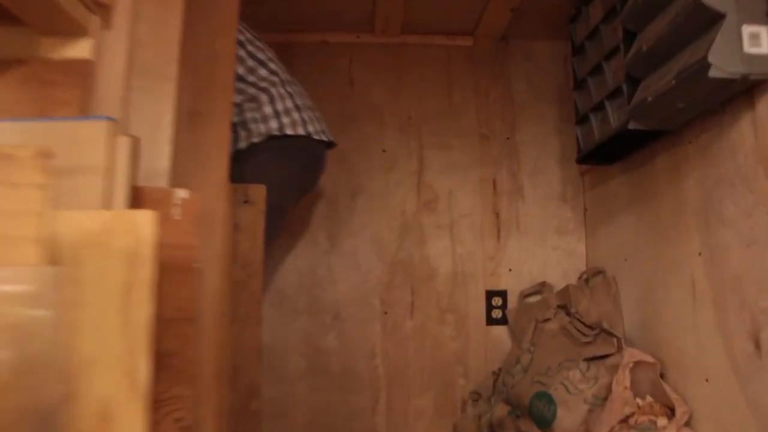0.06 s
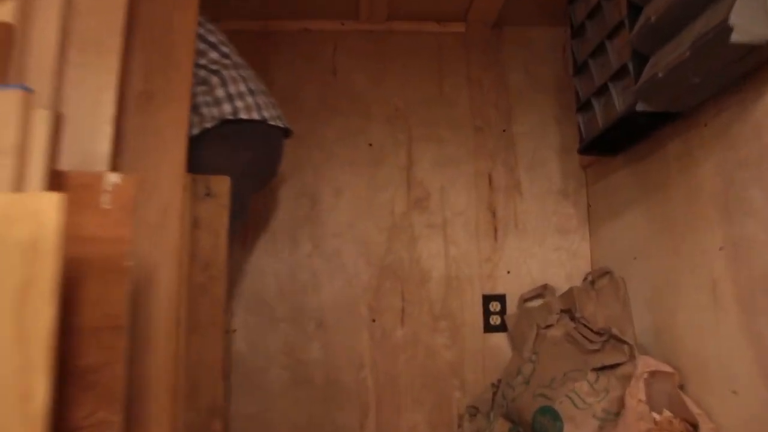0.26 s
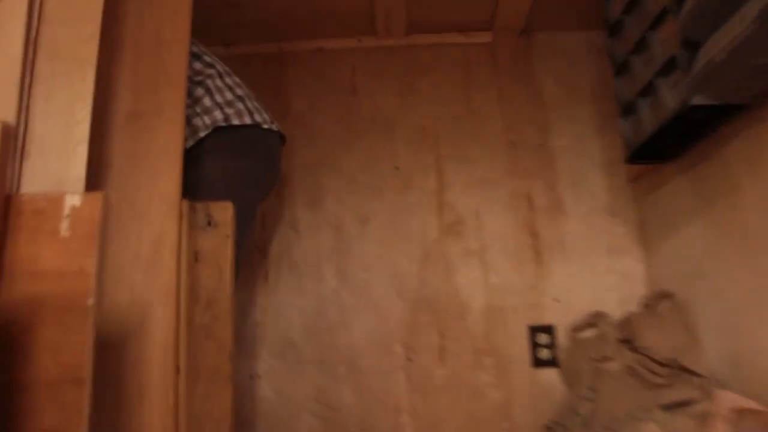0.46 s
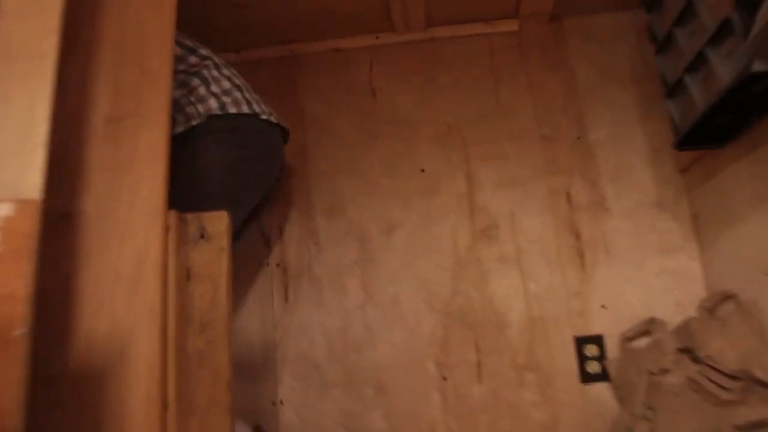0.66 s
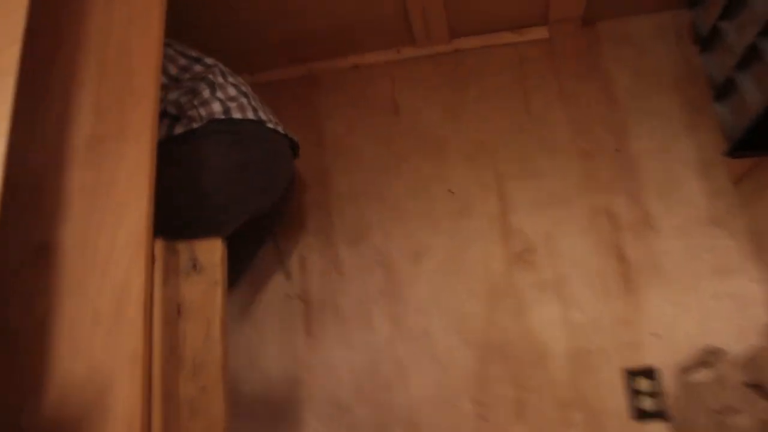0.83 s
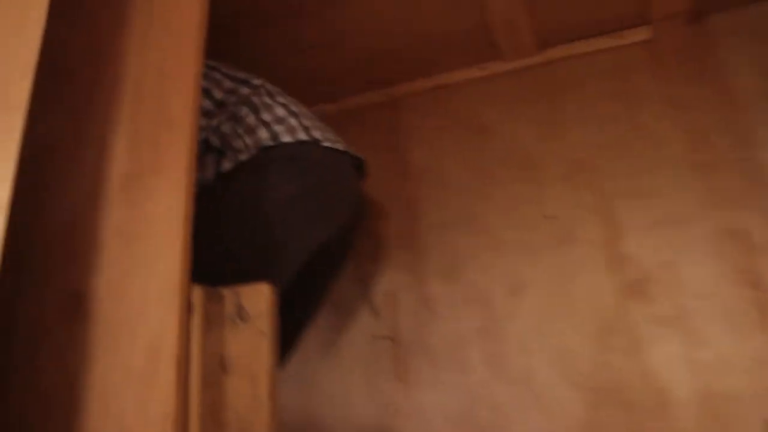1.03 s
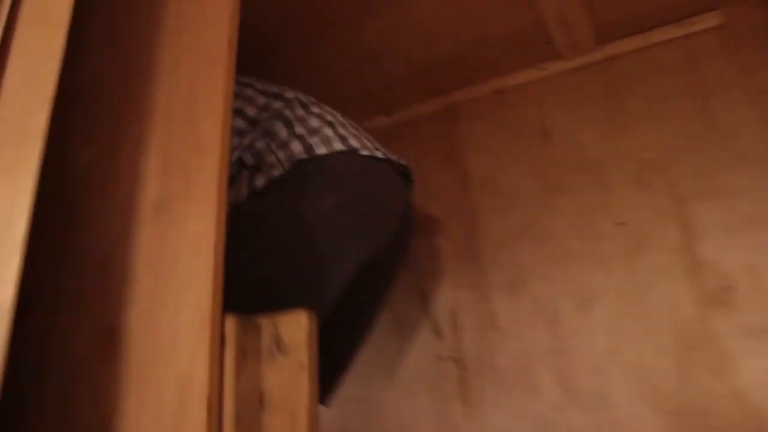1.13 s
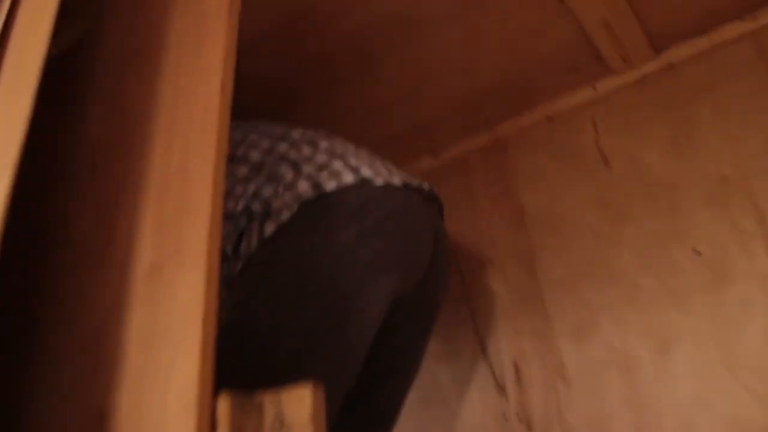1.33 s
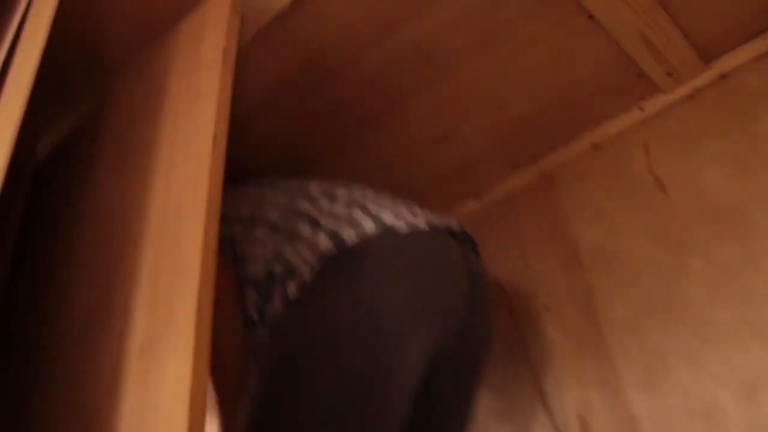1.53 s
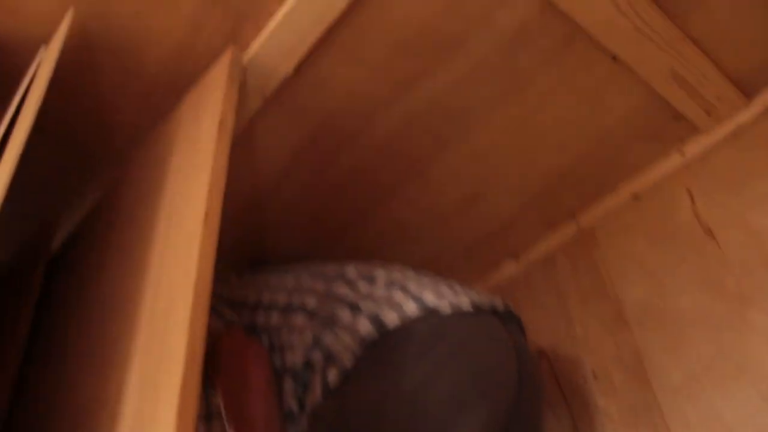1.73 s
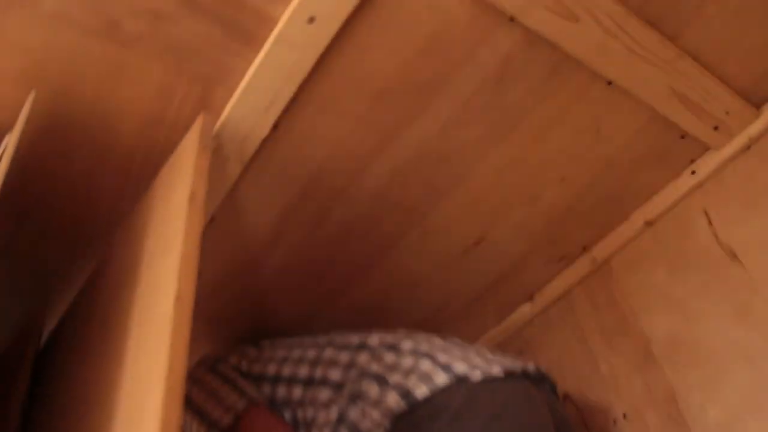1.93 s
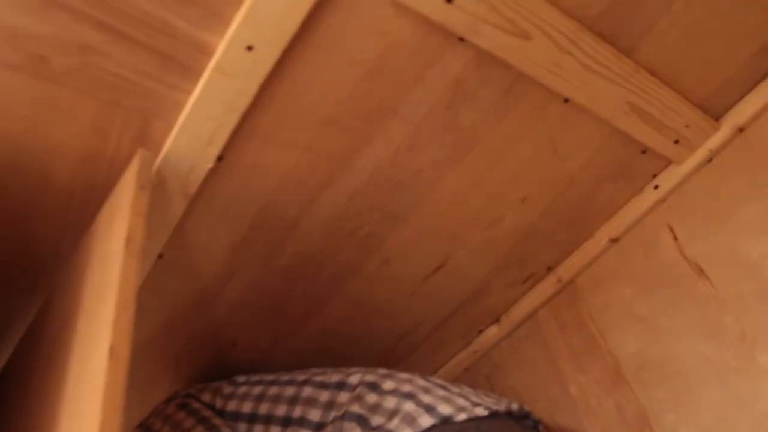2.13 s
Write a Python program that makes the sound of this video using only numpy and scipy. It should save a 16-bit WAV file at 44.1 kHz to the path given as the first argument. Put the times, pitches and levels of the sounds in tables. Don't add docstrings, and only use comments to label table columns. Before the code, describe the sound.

Footsteps climb steep wooden stairs in a small plywood room: two hard, hollow knocks with deep boom, then a soft padded step with scuffing, over steady low motor hum, picked up close in mono.

```python
import sys
import numpy as np
from scipy import signal
from scipy.io import wavfile

SR = 44100
rng = np.random.default_rng(int(sys.argv[2]) if len(sys.argv) > 2 else 0)


def how_loud(loudness_db):
    steps = np.asarray(loudness_db, float) / 20
    return 10 ** steps


def pcm_store(signal):
    levels = np.round(np.clip(np.atleast_2d(signal), -1, 1) * 32767)
    wavfile.write(sys.argv[1], SR, levels.astype(np.int16).T)


N = 97020

# multiple of shaft rate, level/dB rms, waver/dB, phase/turns
HUM_LINES = [(1, -37.5, 1.17, 0.06), (2, -41.5, 1.83, 0.6), (3, -57.5, 1.3, 0.39), (4, -59, 2, 0.73),
             (15, -69, 2.8, 0.33)]
SHAFT_HZ = 58.9
FAN_HZ, FAN_DB = 92.6, -45
# f/Hz, width/Hz, level/dB rms
CASING_MODES = [(281, 39, -62), (538.6, 24, -64), (623, 22, -66), (1163, 8.3, -73), (1570, 20, -82.5),
                (2433, 8, -73.5)]
# f/Hz, level/dB per Hz
AIR_SPECTRUM = [(12, -5), (30, -2.5), (75, -9), (145, -14), (280, -18), (400, -27.5), (958, -33.5),
                (2400, -38)]
AIR_DB, AIR_TOP_HZ, AIR_TOP_DB = -43.5, 15700, -81

# t/s, level/dB
RUSTLE_LEVEL = [(0, -61.5), (.05, -67.5), (.2, -69.5), (.36, -63.5), (.5, -67.5), (.66, -65), (.72, -62.5),
                (.88, -63.5), (.93, -67.5), (1.02, -68.5), (1.2, -66.5), (1.27, -70), (1.5, -68),
                (1.62, -69), (1.7, -67.5), (1.78, -72.5), (2.17, -69), (2.2, -73)]
# f/Hz, level/dB per Hz
CLOTH_SPECTRUM = [(1500, -18), (2500, -0.5), (4000, 3), (6000, -0.5), (9000, -1.5), (12000, -1.5),
                  (16500, -10.5)]

# t/s, peak level/dB, f/Hz, t60/s
GRIT_TICKS = [
    (0.152, -41.5, 2980, 0.013),
    (.4095, -58, 5500, 0.0057),
    (0.4097, -47, 6060, 0.0071),
]

# t/s, peak level/dB, sway level/dB, boom level/dB
HARD_STEPS = [
    (.217, -6, -22, -16),
    (1.033, -9, -17.5, -19.5),
]
# f/Hz, level/dB, t60/s
FIRST_TREAD_MODES = [(152, -4, 0.13), (234, 2, 0.04), (408, 4, 0.072), (467, 2.5, 0.062), (610, -5, 0.11),
                     (773, -11, 0.055), (866, -8.5, 0.1), (1017, -5.5, 0.055), (1185, 0.5, 0.034),
                     (1648, 0.5, 0.025), (2020, -20, 0.082), (2320, -14, 0.08), (2490, -22, .06),
                     (3080, -6, 0.017)]
# f/Hz, level/dB, t60/s
SECOND_TREAD_MODES = [(195, 2.5, 0.08), (309, 1.5, 0.052), (407, -2, 0.04), (660, -18, 0.09),
                      (742, -6, 0.062), (980, -10.5, 0.064), (1186, -10.5, 0.053), (1340, -6, 0.046),
                      (1470, -14.5, 0.024), (1714, -6, 0.04), (2027, -17.5, 0.095), (2468, -7.5, 0.038),
                      (2743, -10, 0.039), (3380, -16.5, 0.037)]
# f/Hz, level/dB per Hz
FIRST_KNOCK_SPECTRUM = [(59, -29), (100, 3), (262, -9.5), (434, -2.5), (748, -13), (1960, -20), (4350, -32),
                        (15000, -94)]
# f/Hz, level/dB per Hz
SECOND_KNOCK_SPECTRUM = [(59, -27), (100, -3.5), (375, -19.5), (646, -12), (1090, -33), (1210, -24),
                         (2580, -29.5), (15000, -108)]
# f/Hz, t60/s
KNOCK_DECAY = [(100, 0.29), (420, 0.2), (1100, .21), (2900, 0.14), (7000, 0.089), (15000, .1)]
KNOCK_DB, RING_DB, KNOCK_RISE_S = -10, -7.5, 0.0034
CRACK_DB, CRACK_T60_S = 9, 0.016
# f/Hz, level/dB, t60/s
SWAY_MODES = [(26.0, 0, .85), (31.6, -.5, .85)]
SWAY_LAG_S = 0.0156
# f/Hz, level/dB, delay/s, rise/s
STRINGER_BOOMS = [
    [(66.5, -3.5, 0.0236, 0.0145), (96.4, -4, 0.0079, 0.0068)],
    [(51.8, 6, 0.0097, 0.014), (102.7, -1, 0.0139, 0.023)],
]

# t/s, level/dB rms, rise/s, t60/s, brightness/0-1
SOLE_SCUFFS = [(0.218, -44.5, .0004, 0.032, 1), (.285, -48, 0.011, 0.15, 0.9), (.31, -47, .012, .07, 0.4),
               (1.039, -43, 0.0021, 0.12, 1), (1.0862, -26, 0.00043, 0.038, 0.63),
               (1.089, -45, 0.0015, 0.32, 0.38), (1.455, -37.5, 0.01, 0.094, 0.22),
               (1.544, -35, 0.0056, 0.095, 0.5), (1.569, -60, 0.003, 0.072, 0),
               (1.6, -50.5, 0.0083, 0.39, 0.82)]
# f/Hz, level/dB per Hz
SOLE_SPECTRUM = [(400, -19), (800, -3.5), (1700, 0.5), (3200, -0.5), (5000, -13.5), (6500, -11),
                 (9000, -21.5), (15500, -23.5)]
SOLE_TILT_DB = 6.5

# t/s, level/dB rms, rise/s, t60/s
PADDED_SHUFFLES = [
    (1.569, -32.5, 0.00082, 0.11),
    (1.606, -36.5, .003, 0.12),
    (1.633, -39, 0.015, 0.24),
]
# f/Hz, level/dB per Hz
SHUFFLE_SPECTRUM = [(200, -10), (330, 4.5), (640, -5.5), (1000, -14), (2000, -15.5), (5000, -31.5)]
# t/s, peak level/dB, f/Hz, t60/s
SOFT_CONTACTS = [(1.570, -20.5, 232.6, 0.072), (1.571, -13.5, 121.5, 0.072), (1.569, -36.5, 588, 0.084),
                 (1.607, -14.5, 125, 0.053), (1.606, -28.5, 420, 0.028), (1.634, -20, 109, 0.098),
                 (1.643, -25, 73, .12), (1.74, -31.5, 44, 1)]
PAD_RISE_S = 0.004

NOTCH_HZ, NOTCH_WIDTH_HZ, NOTCH_SHARE = 10480, 320, 0.58
CUTOFF_HZ = 15900


def rms_one(x):
    return x / np.sqrt(np.mean(x ** 2) + 1e-20)


def at_hz(points, hz):
    table_hz, values = np.array(points).T
    return np.interp(np.log(hz), np.log(table_hz), values)


def drift(rate):
    pole = np.exp(-80 * np.pi * rate / SR)
    white = rng.standard_normal(N // 40 + 2002)
    slow = signal.lfilter([1], [1, -2 * pole, pole * pole], white)[2000:]
    return np.interp(np.arange(N) / 40, np.arange(len(slow)), rms_one(slow))


def since(s):
    return np.maximum(np.arange(N) / SR - s, 0)


def dying(t, t60, rise):
    return (1 - np.exp(-t / max(rise, 1e-5))) * np.exp(-np.log(1000) * t / t60)


def mode(t, hz, t60, rise=0.00027):
    return dying(t, t60, rise) * np.sin(2 * np.pi * hz * t)


def noise_bands():
    edges = 18 * 2 ** np.arange(0, 10.1, 1 / 3)
    white = rng.standard_normal((2, N + 8000))
    for k, (low, high) in enumerate(zip(edges, edges[1:])):
        band_filter = signal.butter(2, [low, high], "band", fs=SR, output="sos")
        band = signal.sosfilt(band_filter, white[k % 2])
        yield np.sqrt(low * high), band[8000:]


def coloured(spectrum, patchy_db, rate, tilt_db=0):
    together = drift(rate / 4)
    total = np.zeros(N)
    for hz, band in noise_bands():
        patches_db = patchy_db * (0.2 * together + drift(rate))
        total += band * how_loud(at_hz(spectrum, hz) + tilt_db * np.log2(hz / 3000) + patches_db)
    return rms_one(total)


def motor():
    t = np.arange(N) / SR
    lines = how_loud(FAN_DB + 1.2 * drift(5.6)) * np.sin(2 * np.pi * FAN_HZ * t)
    for multiple, db, waver_db, turns in HUM_LINES:
        level = how_loud(db + waver_db * drift(6.2))
        lines += level * np.sin(2 * np.pi * (multiple * SHAFT_HZ * t + turns))
    casing = np.zeros(N)
    for hz, width, db in CASING_MODES:
        resonance = signal.lfilter(*signal.iirpeak(hz, hz / width, fs=SR), rng.standard_normal(N))
        casing += how_loud(db + 0.83 * drift(0.4)) * rms_one(resonance)
    air = coloured(AIR_SPECTRUM + [(AIR_TOP_HZ, AIR_TOP_DB)], patchy_db=0.27, rate=13)
    return np.sqrt(2) * lines + casing + how_loud(AIR_DB) * air


def rustle():
    s, db = np.transpose(RUSTLE_LEVEL)
    level = how_loud(np.interp(np.arange(N) / SR, s, db))
    return level * coloured([(500, -86)] + CLOTH_SPECTRUM, patchy_db=-0.7, rate=8)


def grit_ticks():
    return sum(how_loud(db) * mode(since(s), hz, t60) for s, db, hz, t60 in GRIT_TICKS)


def tread_ring(t, modes):
    return sum(how_loud(db) * mode(t, hz, t60) * (-1) ** k for k, (hz, db, t60) in enumerate(modes))


def knock_tail(t, spectrum):
    bands = [(hz, band * how_loud(at_hz(spectrum, hz))) for hz, band in noise_bands() if hz > 90]
    scale = np.std(sum(band for _, band in bands))
    crack = how_loud(CRACK_DB) * dying(t, CRACK_T60_S, 0.00017)
    tail = np.zeros(N)
    for hz, band in bands:
        tail += band * (dying(t, at_hz(KNOCK_DECAY, hz), KNOCK_RISE_S) + crack * (hz > 1300))
    return tail / scale


def flight_sway(s):
    t = since(s + SWAY_LAG_S)
    return sum(how_loud(db) * mode(t, hz, t60, 0.01) * (-1) ** k for k, (hz, db, t60) in enumerate(SWAY_MODES))


def stringer_boom(s, booms):
    total = np.zeros(N)
    for hz, db, lag, rise in booms:
        t = since(s + lag)
        swell = np.e * t / rise * np.exp(-t / rise)
        total += how_loud(db) * swell * np.sin(2 * np.pi * hz * t)
    return total


def step(s, db, sway_db, boom_db, tread, knock, booms):
    t = since(s)
    strike = how_loud(RING_DB) * tread_ring(t, tread) + how_loud(KNOCK_DB) * knock_tail(t, knock)
    return how_loud(db) * strike + how_loud(sway_db) * flight_sway(s) + how_loud(boom_db) * stringer_boom(s, booms)


def hard_steps():
    treads = (FIRST_TREAD_MODES, SECOND_TREAD_MODES)
    knocks = (FIRST_KNOCK_SPECTRUM, SECOND_KNOCK_SPECTRUM)
    total = np.zeros(N)
    for row, tread, knock, booms in zip(HARD_STEPS, treads, knocks, STRINGER_BOOMS):
        total += step(*row, tread, knock, booms)
    return total


def scuffs():
    dull = coloured(SOLE_SPECTRUM, patchy_db=1.2, rate=60, tilt_db=-SOLE_TILT_DB / 2)
    bright = coloured(SOLE_SPECTRUM, patchy_db=1.2, rate=60, tilt_db=SOLE_TILT_DB / 2)
    total = np.zeros(N)
    for s, db, rise, t60, shine in SOLE_SCUFFS:
        shine = np.clip(shine, 0, 1)
        total += how_loud(db) * dying(since(s), t60, rise) * (shine * bright + (1 - shine) * dull)
    return total


def padded_shuffle():
    level = sum(how_loud(db) * dying(since(s), t60, rise) for s, db, rise, t60 in PADDED_SHUFFLES)
    return level * coloured(SHUFFLE_SPECTRUM + [(12000, -61)], patchy_db=1.5, rate=58)


def soft_landing():
    return sum(how_loud(db) * mode(since(s), hz, t60, PAD_RISE_S) for s, db, hz, t60 in SOFT_CONTACTS)


def scene():
    background = motor() + rustle()
    feet = grit_ticks() + hard_steps() + scuffs() + padded_shuffle() + soft_landing()
    return (background + feet)[None]


def top_cut(x):
    return signal.sosfilt(signal.butter(12, 16530, fs=SR, output="sos"), x)


def record(dry):
    dip = signal.lfilter(*signal.iirpeak(NOTCH_HZ, NOTCH_HZ / NOTCH_WIDTH_HZ, fs=SR), dry)
    low_pass = signal.ellip(10, 0.5, 60, CUTOFF_HZ, fs=SR, output="sos")
    mix = signal.sosfilt(low_pass, dry - NOTCH_SHARE * dip)
    return top_cut(mix)


dry = scene()
out = record(dry)
pcm_store(out)
```